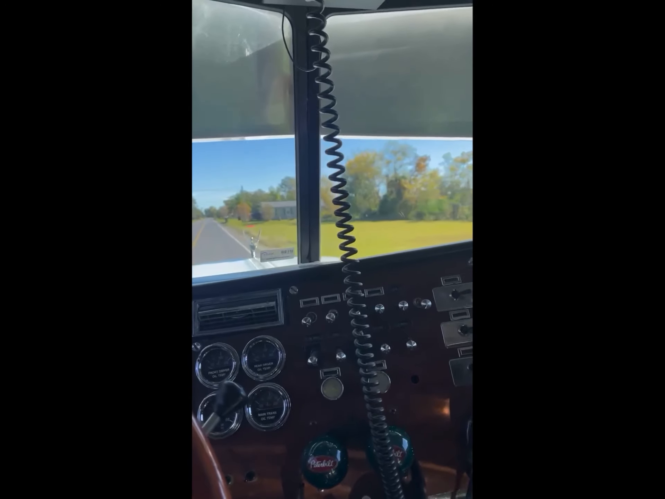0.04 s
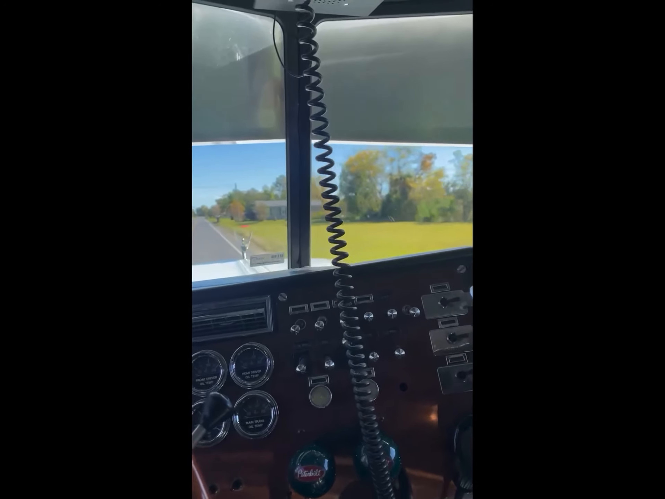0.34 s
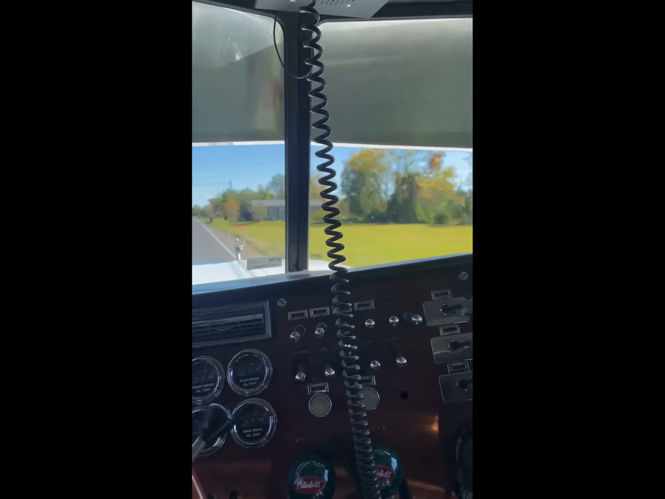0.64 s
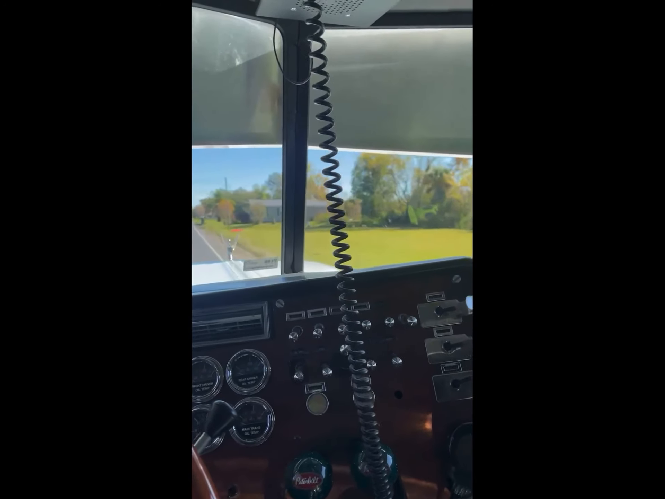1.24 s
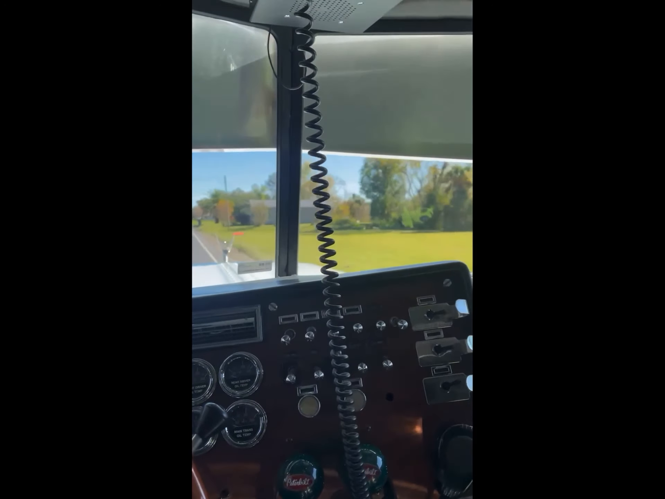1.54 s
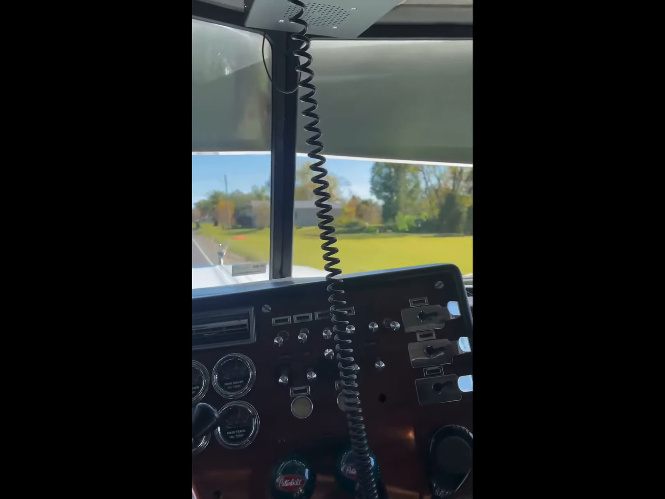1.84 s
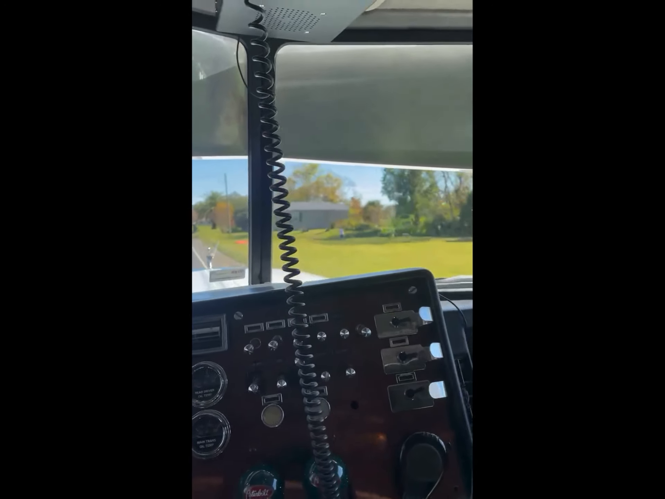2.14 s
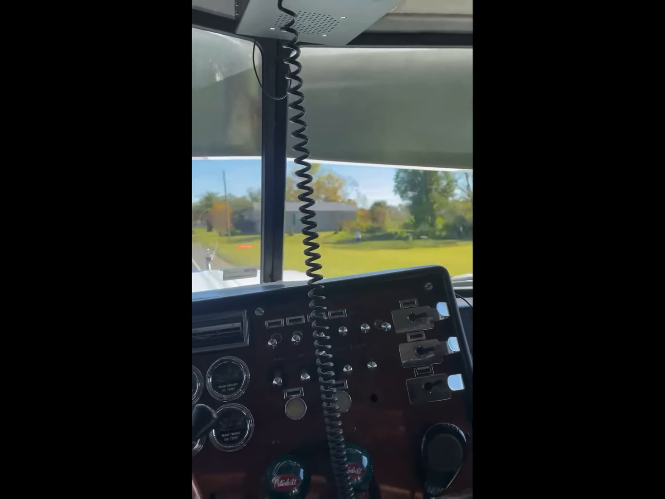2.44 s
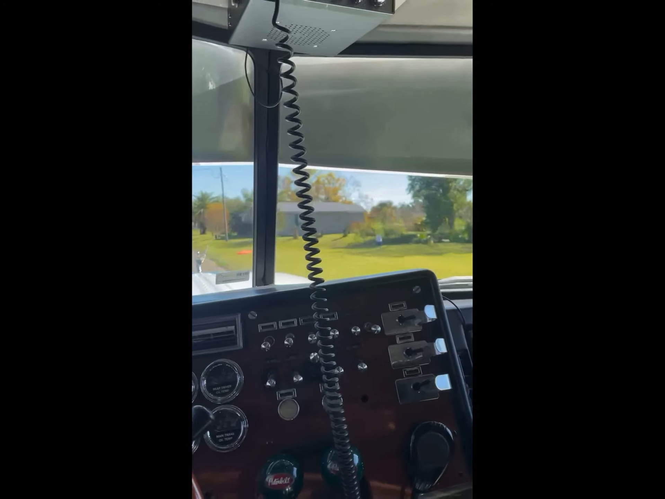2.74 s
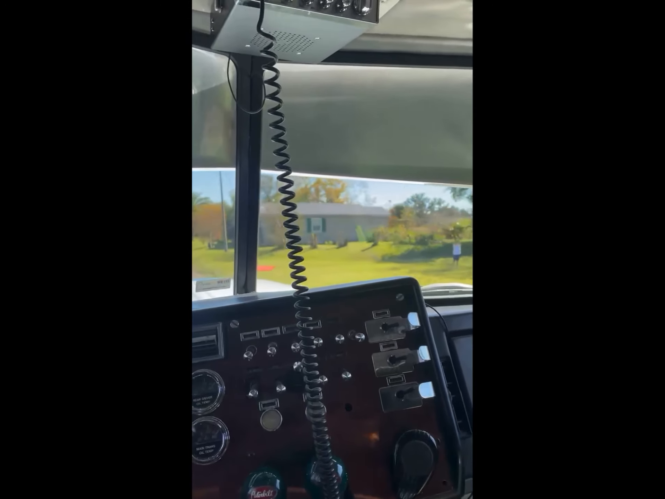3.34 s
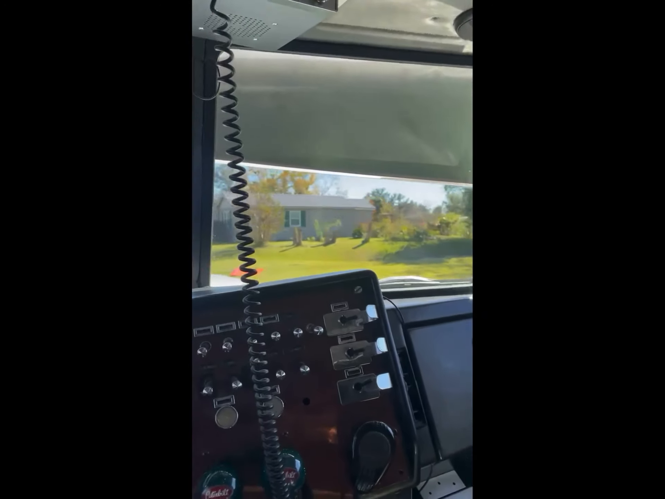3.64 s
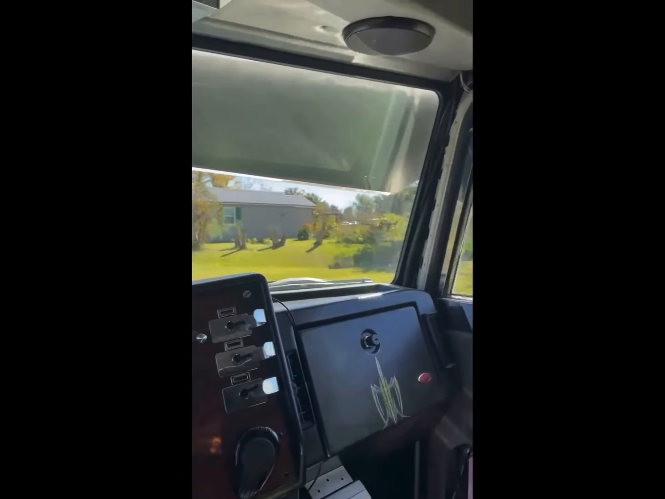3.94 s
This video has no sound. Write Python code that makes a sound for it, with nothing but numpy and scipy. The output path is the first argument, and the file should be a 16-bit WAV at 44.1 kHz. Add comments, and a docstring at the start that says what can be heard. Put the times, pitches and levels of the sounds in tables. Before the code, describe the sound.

Two loud air horn blasts, nearly joined, cut through engine drone in a moving truck's cab.

```python
"""Air horn from inside a truck

In the cab of a moving truck, a six-cylinder diesel drones over road noise and small rattles.
The air valve ticks, and the driver sounds a three-trumpet horn twice, easing off only briefly between.
Air makes a reed buzz in each trumpet, and the three notes form a chord. The recorder's gain control
turns everything down under the horn and stays partly down, so the engine is left faint afterwards."""
import sys
import numpy as np
from scipy import signal
from scipy.fft import rfft, irfft
from scipy.io import wavfile
from scipy.ndimage import uniform_filter1d, minimum_filter1d

SR = 44100
rng = np.random.default_rng(int(sys.argv[2]) if len(sys.argv) > 2 else 0)


def generate_wav(signal):
    """Clip the signal to [-1, 1] and save it as 16-bit WAV at the path in sys.argv[1]."""
    frames = np.transpose(np.atleast_2d(signal))
    scaled = np.clip(frames, -1, 1) * 32767
    pcm = np.round(scaled).astype(np.int16)
    wavfile.write(sys.argv[1], SR, pcm)


N = 176400
T = np.arange(N) / SR
CUTOFF_HZ = 16500

# Air pressure at the horn. Each row: time in seconds, pressure in dB.
PRESSURE = [(2.52, -3), (2.56, -1), (2.62, -0.68), (2.725, -0.52), (2.76, -1.5), (2.80, -5), (2.835, -4.4),
            (2.88, -0.9), (2.935, .5), (2.98, 0.5), (3.165, 0.2), (3.2, -2), (3.24, -6.5), (3.27, -15),
            (3.3, -32), (3.34, -70)]
# The three trumpets. Each row: pitch in Hz, start in seconds, rise time in seconds,
# level of the lowest tone in dB, extra dB lost for each dB the pressure drops.
TRUMPETS = [(317.7, 2.545, 0.029, -11, 0), (384.6, 2.531, 0.044, 5, 0), (483.4, 2.523, .018, -10, .8)]


def horn():
    """Three reeds share one air valve: more pressure makes them louder, brighter and a little flatter."""
    # Each row: one trumpet's overtone levels in dB, from twice its pitch upwards.
    overtones = [
        [-10.5, -5.5, -16.5, -16, -17.5, -20, -26, -20, -20, -28, -29, -33, -33.5],
        [-9.5, -16.5, -13.5, -15.5, -11.5, -21, -14, -25, -19, -23.5, -21.5, -30, -23.5, -27],
        [-10.5, -11, -18.5, -13, -21.5, -22.5, -28.5, -26, -31, -31.5, -35, -32, -35],
    ]
    # The highest overtones as heard, with a gap near 8 kHz that is not the horn's own.
    # Each row: frequency in Hz, level in dB.
    top_tones = [(4500, -34.5), (5800, -28), (6700, -51.5), (8000, -65), (9500, -38), (11500, -48.5),
                 (13000, -50.5), (15500, -67)]
    sharp_per_db, most_sharp, sag_per_s = .003, .014, .01   # as fractions of the pitch
    settle_s, brassiness = .045, .65
    blown = (T > PRESSURE[0][0]) & (T < PRESSURE[-1][0])
    t, out = T[blown], np.zeros((2, N))
    pressure_db = in_time(PRESSURE, t)
    bend = 1 + np.minimum(-sharp_per_db * pressure_db, most_sharp) - sag_per_s * (t - t[0])
    for (pitch_hz, start, rise, first_db, extra_loss), upper_db in zip(TRUMPETS, overtones):
        age, levels = np.maximum(t - start, 0), [first_db, *upper_db]
        # Each reed starts sharp and flaps unevenly until it settles.
        settling = (.03 + .011 * drift(170, t)) * np.exp(-age / settle_s)
        unsteady = settling + .0015 * drift(150, t) + .0008 * drift(9.7, t)
        phase = 2 * np.pi * np.cumsum(pitch_hz * (bend + unsteady)) / SR
        for k in range(1, int(CUTOFF_HZ / pitch_hz)):
            hz = k * pitch_hz
            db = levels[k - 1] if k <= len(levels) else at_hz(top_tones, hz) + 3 * rng.uniform(-1.7, 1.65)
            # Higher tones follow the pressure more steeply and build up more slowly.
            steepness = min((hz / TRUMPETS[1][0]) ** brassiness + extra_loss, 5.5)
            build_s = .004 * hz / 1000
            onset = np.minimum(age / rise, 1) * (1 - np.exp(-age / build_s))
            out[:, blown] += onset * from_db(db + steepness * pressure_db) * horn_tone(k * phase, hz, t)
    return out


def horn_tone(phase, hz, t):
    """One tone reaches left and right with wavering cab echoes, which are stronger for high tones."""
    # The horn's balance. Each row: frequency in Hz, left minus right level in dB.
    balance = [(380, 2.6), (700, 4.5), (1290, 4.5), (2380, 2), (4400, .7)]
    height = np.sqrt(hz / 1000)
    sides = np.array([[1], [-1]])
    phase_gap = min(.34 * height ** 1.67, 1.7)   # radians between left and right
    direct = np.exp(.5j * sides * phase_gap * rng.choice([1, -1]))
    scatter = .34 * height * min(height, 1) ** 2
    echoes = np.array([drift(16.3, t) + 1j * drift(16.3, t) for _ in sides]) / np.sqrt(2)
    wave = (direct + scatter * echoes) * np.exp(1j * (phase + 2 * np.pi * rng.random()))
    return wave.real * np.sqrt(2 / (1 + scatter ** 2)) * from_db(sides * at_hz(balance, hz) / 2)


def air_rasp(level_db=-13.5, steepness=3.6):
    """Air rasps through the reeds, growing quickly louder with the pressure."""
    # The rushing air. Each row: frequency in Hz, relative level in dB.
    rasp = [(150, -18), (400, -5), (1000, -2.5), (1800, -5), (3000, -4.5), (5600, -13.5), (6800, -36),
            (8000, -42), (10500, -16), (12500, -26.5), (15500, -50)]
    start, rise = TRUMPETS[1][1:3]
    onset = np.clip((T - start) / rise, 0, 1) ** 2
    level = onset * from_db(level_db + steepness * in_time(PRESSURE))
    return level * shape_noise(rasp, rng.standard_normal((2, N)))


def cab_ring(x, level_db=-13.5, ring_s=.32, above_hz=1800):
    """The cab's hard surfaces add a short bright ring, different on the left and right."""
    t = T[:SR // 4]
    tail = rng.standard_normal((2, len(t))) * from_db(-60 * t / ring_s)
    treble = signal.butter(2, above_hz, "high", fs=SR, output="sos")
    tail = signal.sosfilt(treble, rms_one(tail) / np.sqrt(len(t)))
    return x + from_db(level_db) * signal.fftconvolve(x, tail, axes=1)[:, :N]


def engine(cycles, waver_db=1.5):
    """The exhaust booms steadily while gears and valves whine, all in step with the engine."""
    # Exhaust tones, then gear and valve tones. Each row: vibrations per engine cycle, level in dB.
    exhaust_tones = [(3, -37), (5, -37.5), (6, -10.5), (8, -33.5), (9, -17.5), (10, -28.5), (12, -17.5),
                     (15, -33.5), (18, -35)]
    gear_tones = [(21, -40), (24, -38.5), (28, -37.5), (30, -36.5), (33, -42.5), (35, -39.5), (58, -43.5),
                  (64, -43), (69, -40.5), (75, -41), (77, -44), (87, -41)]
    # How the whine fades. Each row: time in seconds, added level in dB.
    whine_fade = [(0, 2.5), (1.1, -1), (1.8, -5.5), (4, -5)]
    boom = sum(from_db(db) * np.sin(2 * np.pi * k * cycles) for k, db in exhaust_tones)
    whine = 0
    for k, db in gear_tones:
        whine += from_db(db + waver_db * drift(2)) * np.sin(2 * np.pi * (k * cycles + rng.random()))
    return np.sqrt(2) * (boom + from_db(in_time(whine_fade)) * whine)


def road(cycles, throb_depth=.084, shake_db=-5.5):
    """Road noise and clatter throb with the engine, and the cab shakes alike in every engine cycle."""
    # Road noise with clatter, then the shaking cab. Each row: frequency in Hz, relative level in dB.
    rumble = [(25, -7), (60, 3), (120, 5.5), (200, -1), (400, -1.5), (560, -7.5), (920, -8.5), (1200, -13),
              (1650, -17), (1980, -12.5), (2600, -23), (3650, -22.5), (4500, -33), (5500, -26.5),
              (6600, -39.5), (8000, -69.5), (9500, -40.5), (11000, -45), (13000, -55.5), (16000, -70)]
    shake = [(30, -12.5), (60, -0.5), (160, -5.5), (230, -7), (400, -0.5), (560, -9), (900, -4),
             (1200, -14), (2000, -18), (4000, -37.5), (8000, -66.5)]
    # The loudness of both. Each row: time in seconds, level in dB.
    loudness = [(0, -23), (1.2, -24.5), (1.8, -24.5), (2.5, -24.5), (4, -29.5)]
    cycle_samples = int(SR / cycles[-1] * T[-1])
    repeating = rng.standard_normal((2, cycle_samples))[:, (cycles % 1 * cycle_samples).astype(int)]
    throb = 1 + throb_depth * np.cos(6 * np.pi * cycles)   # three swells per cycle
    noise = shape_noise(rumble, rng.standard_normal((2, N)) * throb)
    return from_db(in_time(loudness)) * (noise + from_db(shake_db) * shape_noise(shake, repeating))


def rattles_and_ticks(fade_s=.017):
    """Three small rattles, then two short, bright ticks of the air valve just before the horn."""
    # The rattles, then the ticks. Each row: start in seconds, level in dB.
    hits = [(1.925, -50), (2.075, -47.5), (2.125, -52), (2.415, -49.5), (2.495, -47)]
    # Their tone colour. Each row: frequency in Hz, relative level in dB.
    colour = [(1000, -11.5), (3000, -1.5), (6000, -3), (8000, -18), (10500, -1), (15000, -17)]
    level = sum(from_db(db) * (T > start) * np.exp(-np.abs(T - start) / fade_s) for start, db in hits)
    return level * shape_noise(colour, rng.standard_normal((2, N)))


def shape_noise(spectrum, white):
    """Turn two white noises into stereo noise of strength 1 with the given tone colour."""
    # How alike left and right are. Each row: frequency in Hz, likeness from 0 to 1 (identical).
    likeness = [(130, .9999), (290, 1), (640, 0.87), (1410, 0.63), (3100, 0.65), (6820, 0.049),
                (15000, 0.36)]
    hz = np.arange(N // 2 + 1) * SR / N
    alike = at_hz(likeness, hz)
    mid, side = rfft(white) * from_db(at_hz(spectrum, hz)) * np.sqrt([1 + alike, 1 - alike])
    return rms_one(irfft([mid + side, mid - side], N))


def drift(rate, t=T):
    """A smooth random wobble of size about 1 that changes about rate times a second."""
    step = 40   # samples between random values
    r = np.exp(-2 * np.pi * step * rate / SR)
    slow = signal.lfilter([1], [1, -2 * r, r * r], rng.standard_normal(len(t) // step + 2002))[2000:]
    return np.interp(np.arange(len(t)) / step, np.arange(len(slow)), rms_one(slow))


def from_db(db):
    """Turn decibels into a multiplier."""
    return 10 ** (np.asarray(db) / 20)


def rms_one(x):
    """Scale a signal to an average strength (rms) of 1."""
    return x / np.sqrt(np.mean(x ** 2) + 1e-20)


def in_time(rows, t=T):
    """Read a curve at the given times."""
    return np.interp(t, *np.transpose(rows))


def at_hz(rows, hz):
    """Read a curve at the given frequencies, with octaves evenly spaced."""
    freqs, values = np.transpose(rows)
    return np.interp(np.log(np.maximum(hz, 1)), np.log(freqs), values)


def scene():
    """Horn, engine, road, rattles and valve ticks as heard in the cab."""
    # Engine speed. Each row: time in seconds, turns per minute.
    speed = [(0, 1466), (.9, 1469.5), (2.1, 1466), (4, 1459.5)]
    first_firing_s = .012
    cycles = (np.cumsum(in_time(speed)) / SR - first_firing_s * speed[0][1]) / 120   # two turns each
    return engine(cycles) + road(cycles) + rattles_and_ticks() + cab_ring(horn() + air_rasp())


def gain_control(x, above_hz=1223, threshold_db=-19.5, attack_s=.017):
    """Loud treble turns the volume down; after a wait, part of it comes back and the rest stays down."""
    hold_s, release_db_per_s, lasting_share = .61, 57, .62
    treble = signal.sosfilt(signal.butter(2, above_hz, "high", fs=SR, output="sos"), x)
    power = uniform_filter1d(np.mean(treble ** 2, axis=0), size=700)
    excess_db = np.maximum(10 * np.log10(np.abs(power) + 1e-12) - threshold_db, 0)
    half_hold = int(hold_s * SR / 2)
    held = -minimum_filter1d(-excess_db, 2 * half_hold + 1, origin=half_hold, mode="nearest")
    released = np.maximum.accumulate(held + release_db_per_s * T) - release_db_per_s * T
    cut_db = np.maximum(released, lasting_share * np.maximum.accumulate(excess_db))
    smoothing = np.exp(-1 / (attack_s * SR))
    return x * from_db(-signal.lfilter([1 - smoothing], [1, -smoothing], cut_db))


def record(dry, hiss_db=-77.5):
    """The recorder turns loud sound down, rounds peaks, adds faint hiss and cuts the highest treble."""
    # The recorder's own hiss. Each row: frequency in Hz, relative level in dB.
    hiss = [(200, 0), (3000, 0), (6000, -3), (8000, -7), (11000, -5.5), (15500, -9)]
    x = gain_control(dry * np.minimum(T / .003, 1))
    x = x / (1 + x ** 4) ** (1 / 4)   # round off the peaks
    x = x + from_db(hiss_db) * shape_noise(hiss, rng.standard_normal((2, N)))
    return signal.sosfilt(signal.cheby2(12, 70, CUTOFF_HZ, fs=SR, output="sos"), x)


dry = scene()
out = record(dry)
generate_wav(out)
```